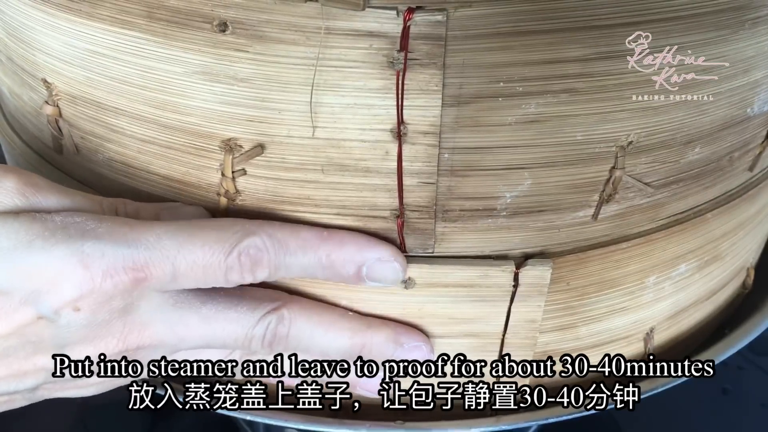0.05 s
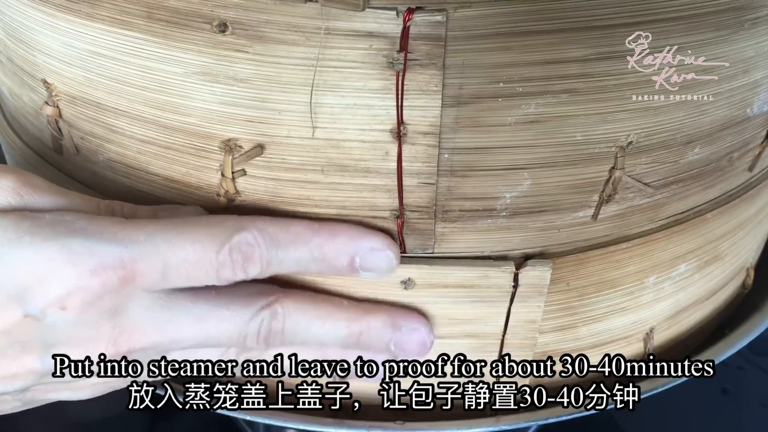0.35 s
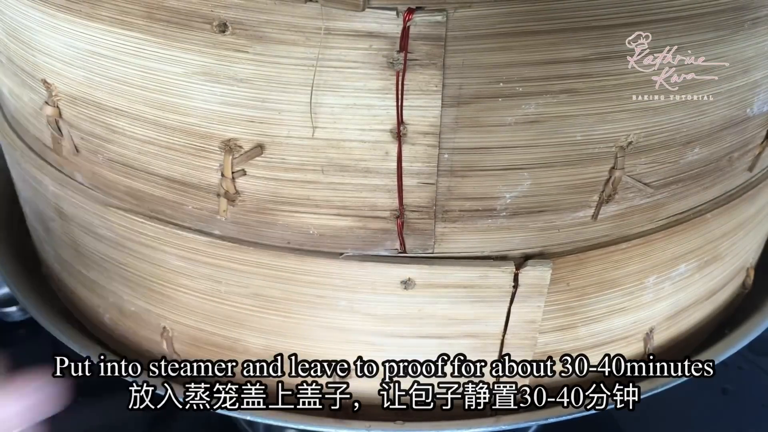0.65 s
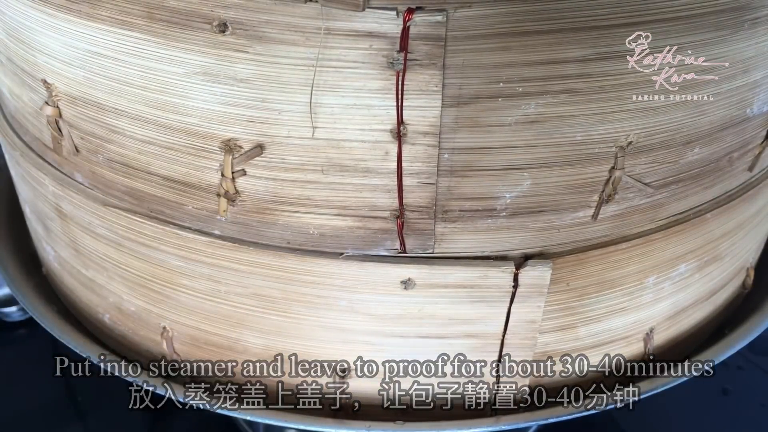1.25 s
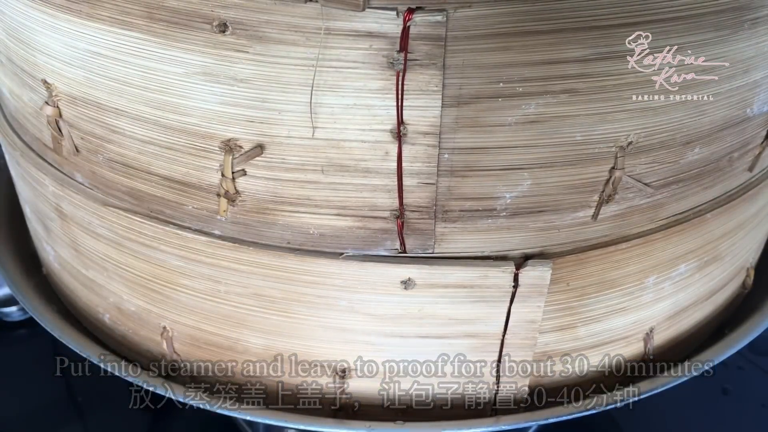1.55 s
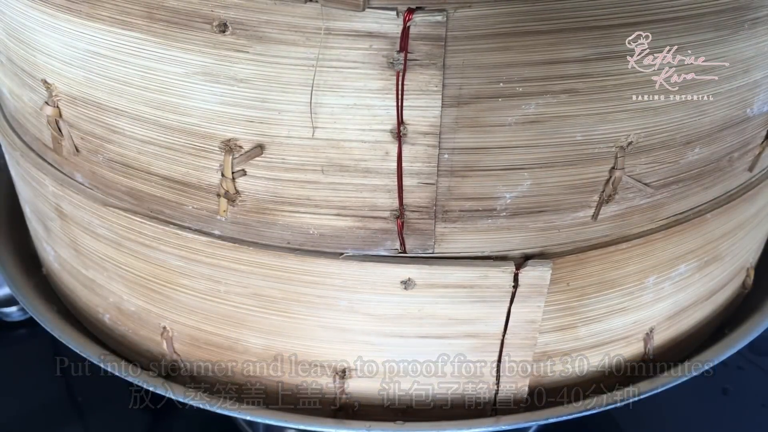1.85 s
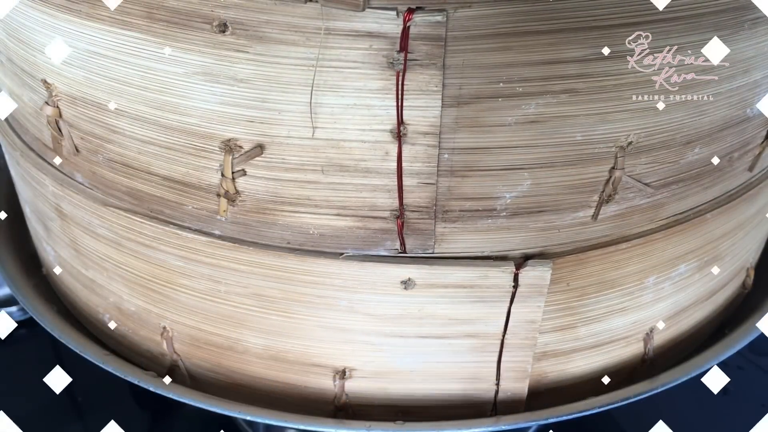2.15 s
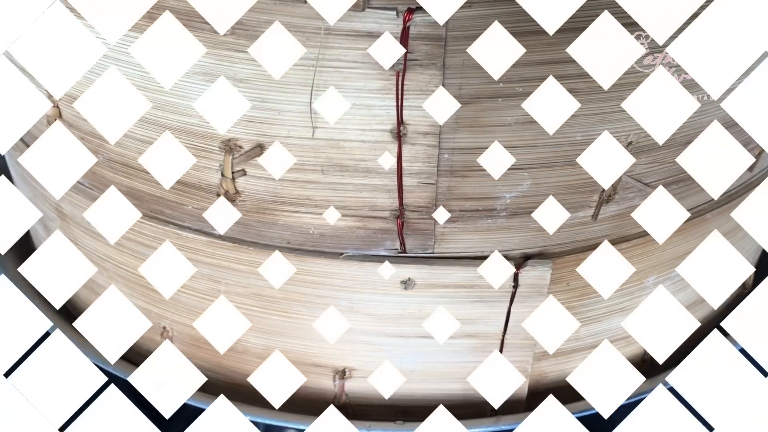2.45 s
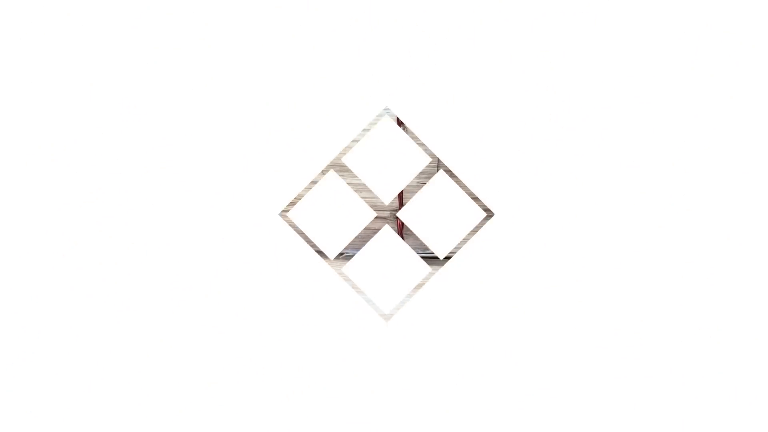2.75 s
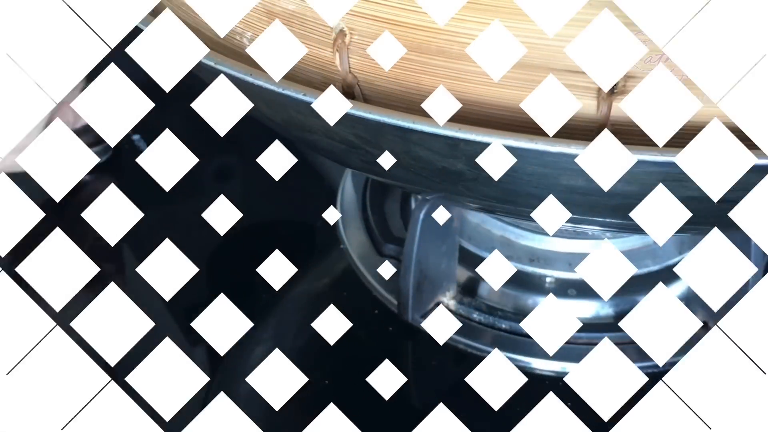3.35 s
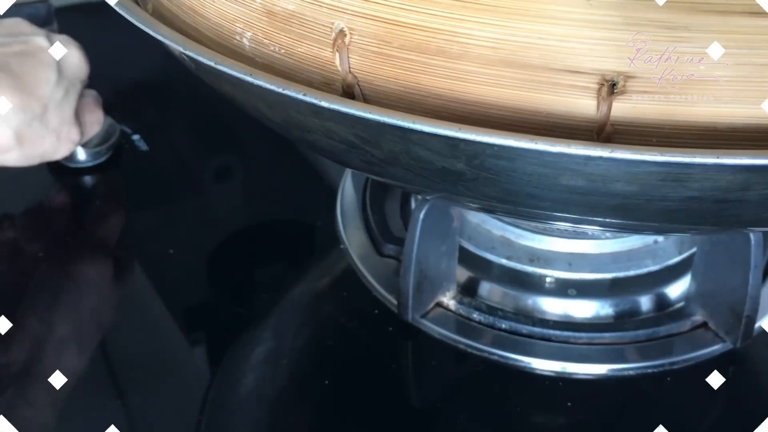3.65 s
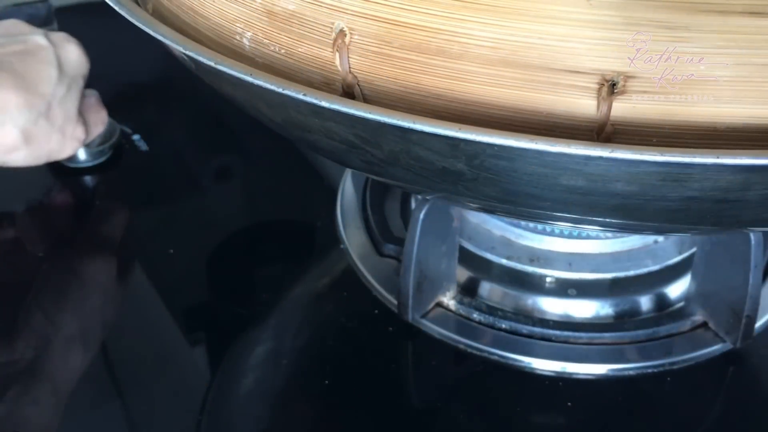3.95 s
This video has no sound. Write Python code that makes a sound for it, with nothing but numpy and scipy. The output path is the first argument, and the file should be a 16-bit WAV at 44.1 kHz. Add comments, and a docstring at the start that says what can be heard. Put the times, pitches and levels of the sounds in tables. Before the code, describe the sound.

A gas stove igniter fires a quick run of sharp snaps under a pan, and the flame catches with a low flutter. Before that come faint kitchen hum, a barely audible brush on a bamboo steamer and a knob click.

```python
"""Lighting a gas stove

A quiet kitchen hums. A hand brushes over a bamboo steamer and lets go. A gas knob is pushed in and
turned; the igniter snaps about nine times a second under the pan, ringing the metal and the room.
The fifth spark lights the gas with a fluttering whoomph; the two sparks in the flame are much weaker."""
import sys
import numpy as np
from scipy import signal
from scipy.fft import rfft, irfft
from scipy.io import wavfile
from scipy.ndimage import uniform_filter1d

SR = 44100
rng = np.random.default_rng(int(sys.argv[2]) if len(sys.argv) > 2 else 0)


def transcribe(u):
    """Save the signal u as a 16-bit wav file named by the first command-line argument.

    u: samples, shape (n,) or (channels, n), limited to [-1, 1]; the rate is SR.
    q: integer samples, one column per channel.
    """
    v = np.clip(np.atleast_2d(u).T, -1, 1)
    q = np.round(v * 32767).astype(np.int16)
    wavfile.write(sys.argv[1], SR, q)


N = 176400
T = np.arange(N) / SR


def from_db(db):
    """Decibels to gain."""
    return 10 ** (np.asarray(db) / 20)


def rms_one(x):
    """Scale to rms 1."""
    return x / np.sqrt(np.mean(x ** 2) + 1e-30)


def energy_one(x):
    """Scale to energy 1."""
    return rms_one(x) / np.sqrt(len(x))


def white():
    """White noise."""
    return rng.standard_normal(N)


def colour(x, points):
    """Minimum-phase filter through (Hz, dB) points, rolled off below 20 Hz."""
    hz, db = np.transpose(points)
    bins_hz = np.maximum(np.arange(N + 1) * SR / (2 * N), 1)
    gain = from_db(np.interp(np.log(bins_hz), np.log(hz), db)) * bins_hz / np.hypot(bins_hz, 20)
    cepstrum = irfft(np.log(gain))
    cepstrum[1:N] *= 2
    cepstrum[N + 1:] = 0
    return irfft(rfft(x, 2 * N) * np.exp(rfft(cepstrum)))[:N]


def rolloff(x, hz, kind):
    """Second-order low- or high-pass."""
    return signal.sosfilt(signal.butter(2, hz, kind, fs=SR, output="sos"), x)


def resonate(x, hz, width_hz):
    """One resonance, applied twice for steep skirts."""
    r = np.exp(-np.pi * width_hz / SR)
    b, a = [1 - r, 0, r - 1], [1, -2 * r * np.cos(2 * np.pi * hz / SR), r * r]
    return signal.lfilter(b, a, signal.lfilter(b, a, x + 1e-18))


def decay(t60_s):
    """Exponential decay."""
    return np.exp(-np.minimum(np.log(1000) * T / t60_s, 60))


def ring(hz, t60_s):
    """Damped sine."""
    return np.sin(2 * np.pi * hz * T) * decay(t60_s)


def add(out, start_s, x):
    """Mix x in from start_s."""
    i = int(np.clip(start_s * SR, 0, N - 1))
    out[i:] += x[:N - i]


def swell(start_s, length_s, rise_share):
    """Rounded rise and fall."""
    corners_s = start_s + length_s * np.array([0, rise_share, 1])
    return np.sin(np.pi / 2 * np.interp(T, corners_s, [0, 1, 0]))


def tones(rows, steady_s=0.046):
    """Narrow noise lines of wavering pitch and nearly even strength."""
    out = np.zeros(N)
    for hz, db, half_width_hz in rows:
        line = rms_one(resonate(rng.standard_normal(N + SR), hz, 2 * half_width_hz)[SR:])
        power = uniform_filter1d(line ** 2, int(steady_s * SR))
        out += from_db(db) * line / np.sqrt(power + 1e-6)
    return out


def scatter(paths, envelope, size=4096, even_over_hz=935):
    """Burst of dense reflections, flattened so only its fine colour is random; energy 1."""
    x = paths[:size]
    for _ in range(4):
        power = uniform_filter1d(np.abs(rfft(x * envelope[:size])) ** 2, int(even_over_hz * size / SR))
        x = rms_one(irfft(rfft(x) / np.sqrt(power + 1e-20)))
    return energy_one(np.pad(x, (0, N - size)) * envelope)


def walls(split_hz=4060):
    """Diffuse room tail; the treble dies sooner."""
    low = rolloff(white(), split_hz, "low") * decay(t60_s=0.69)
    return low + rolloff(white(), split_hz, "high") * decay(t60_s=0.45)


def igniter():
    """Each spark rattles between burner and pan by nearly the same paths, ringing metal and room."""
    # Each row: start in seconds, level in dB, room send in dB.
    sparks = [(3.2710, -3.5, -2.5), (3.3860, -1, -4.5), (3.501, -0.5, -2), (3.6158, -2.5, -0.5),
              (3.7310, -1.5, -1.5), (3.8463, -13, -2), (3.9624, -13, -2.5)]
    # Colour of the gap under the pan. Each row: frequency in Hz, gain in dB.
    gap_colour = [(30, -24), (100, -14), (220, 2.5), (500, -3.5), (850, -9), (1300, -8.5), (1700, -3.5),
                  (4500, -5), (5700, 1), (7800, -5.5), (9400, -8), (10500, -5), (11400, -2), (15500, -4)]
    # Burner and pan. Each row: frequency in Hz, level in dB, T60 in seconds.
    metal_modes = [(208, -31.5, 0.026), (793, -38.5, 0.013), (1524, -47.5, 0.12), (2190, -46.5, 0.14),
                   (2900, -47, 0.13), (5844, -28.5, 0.014), (5710, -38, 0.029), (6180, -36, 0.025),
                   (8980, -35, 0.039), (9450, -21.5, 0.01), (11630, -28.5, 0.016)]
    # Kitchen response. Each row: frequency in Hz, gain in dB.
    room_colour = [(150, 0.5), (350, -7.5), (550, -12), (1200, -5.5), (1600, -0.5), (2300, -3.5),
                   (3000, -1.5), (4500, -1.5), (6400, 4.5), (7800, 0), (9400, 4.5), (10500, -2), (12500, 1),
                   (15500, 3)]
    path_change, room_change = 0.54, 0.41  # fresh noise per spark
    bounce_s = 0.0011  # the crack returns off the pan
    paths = white()
    burst = lambda rise_s, t60_s: energy_one((1 - np.exp(-T / rise_s)) * decay(t60_s))
    crack = burst(rise_s=0.00027, t60_s=0.0059)  # first, hardest reflections
    rattle = from_db(-0.5) * burst(rise_s=0.00031, t60_s=0.01)
    bounce = from_db(-12) * np.interp(T - bounce_s, T, crack)
    envelope = np.sqrt(crack ** 2 + rattle ** 2 + bounce ** 2)
    metal = sum(from_db(db) * ring(hz, t60_s) for hz, db, t60_s in metal_modes)
    tail = walls()
    early = from_db(-2.5) * energy_one(white() * decay(t60_s=0.061))
    snaps, rings, room = np.zeros((3, N))
    for start_s, db, send_db in sparks:
        snap = np.linalg.norm(envelope) * scatter(paths + path_change * white(), envelope)
        late = from_db(-3.5) * energy_one(tail + room_change * walls())
        add(snaps, start_s, from_db(db) * snap)
        add(rings, start_s, from_db(db) * metal)
        add(room, start_s, from_db(db + send_db) * (early + late))
    return colour(snaps, gap_colour) + rings + colour(room, room_colour)


def flame():
    """Fire runs round the burner: turbulent rumble rings the hollow under the pan."""
    # Flame size. Each row: time in seconds, level in dB.
    growth = [(3.725, -80), (3.741, -43), (3.76, -46.5), (3.773, -34.5), (3.81, -43), (3.85, -37.5),
              (3.885, -30), (3.92, -38), (3.97, -39.5), (4.0, -44.5)]
    # Turbulence. Each row: frequency in Hz, gain in dB.
    roar_colour = [(25, -10), (60, 4.5), (95, -6.5), (170, 2.5), (250, -8.5), (320, -7.5), (420, -12.5),
                   (710, -15), (820, -27), (1500, -28), (4000, -40), (12000, -49)]
    # Each row: frequency in Hz, level in dB, half-width in Hz.
    hollow_modes = [(62.3, -6.5, 16), (91, -4.5, 17), (161, -8.5, 18), (318.5, -9.5, 15.6),
                    (496, -18.5, 44), (645, -18.5, 85)]
    # Parts of the burner catch. Each row: start in seconds, level in dB, pitch in Hz, T60 in seconds.
    pops = [(3.764, -28.5, 155, 0.12), (3.875, -27, 98, 0.03)]
    # The spreading flame spits. Each row: start in seconds, level in dB.
    spits = [(3.8635, -23), (3.8902, -18), (3.972, -26.5)]
    times_s, size_db = np.transpose(growth)
    envelope = from_db(np.interp(T, times_s, size_db)) * (T > times_s[0])
    roar = from_db(-4) * rms_one(colour(white(), roar_colour))
    out = envelope * (roar + tones(hollow_modes))
    for start_s, db, hz, t60_s in pops:
        add(out, start_s, from_db(db) * ring(hz, t60_s))
    for start_s, db in spits:
        spit = resonate(white() * decay(t60_s=0.01), hz=556, width_hz=680)
        add(out, start_s, from_db(db) * energy_one(spit))
    return out


def knob():
    """A bright catch, then duller knocks as the valve opens, each with a room tail."""
    # Each row: start in seconds, level in dB, ring in Hz, Q, T60 in seconds, relative tick in dB.
    knocks = [(3.1572, -20.5, 2374, 2.9, 0.04, -4.5), (3.160, -24.5, 475, 1.5, 0.077, -30),
              (3.1949, -29.5, 3130, 7, 0.027, -12), (3.1968, -23.5, 1600, 4.6, 0.025, -30),
              (3.211, -14, 383, 0.96, 0.02, -38), (3.213, -20.5, 861, 7.2, 0.053, -41)]
    # Each row: frequency in Hz, gain in dB.
    tick_colour = [(1000, -16), (3000, -9), (6000, 6), (9500, 5), (10600, -6), (11700, 6), (13000, -7),
                   (16000, -17)]
    body_tail = from_db(1) * energy_one(decay(t60_s=0.38))
    tick_tail = from_db(-4.5) * energy_one(decay(t60_s=0.67))
    tick_envelope = np.hypot(energy_one(decay(t60_s=0.026)), tick_tail)
    out = np.zeros(N)
    for start_s, db, hz, q, t60_s, tick_db in knocks:
        envelope = np.hypot(energy_one(decay(t60_s)) / 2, body_tail)
        rattle = rms_one(resonate(white(), hz, hz / q)) * envelope
        body = energy_one(rattle + from_db(-1.5) * energy_one(ring(hz, t60_s)))
        tick = energy_one(colour(white(), tick_colour) * tick_envelope)
        add(out, start_s, from_db(db) * (body + from_db(tick_db) * tick))
    return out


def steamer_brushes():
    """Grainy friction of a hand on bamboo slats; the fibres crinkle lightly."""
    # Each row: start and length in seconds, level in dB, rise share, ring in Hz, relative ring in dB.
    strokes = [(0.149, 0.048, -68, 0.37, 1480, 0.5), (0.196, 0.082, -68.5, 0.11, 2090, 0),
               (0.212, 0.2, -61, 0.5, 2060, -5.5), (.36, 0.53, -80.5, 0.61, 6040, -10),
               (0.734, 0.13, -73.5, .06, 3020, 2), (0.82, 0.17, -72, 0.39, 3300, -6),
               (.96, 0.18, -79, 0.45, 3300, -20)]
    # Each row: start and length in seconds, level in dB.
    crinkles = [(0.79, 0.51, -78.5), (1.123, 0.42, -74.5), (1.214, 0.026, -60.5), (1.301, 0.021, -68.5)]
    # Each row of both: frequency in Hz, gain in dB.
    rub_colour = [(300, -8), (800, 0), (1800, 4), (2600, 0), (5800, -1.5), (7500, -6.5), (9300, -8),
                  (15000, -12.5)]
    crinkle_colour = [(1500, -14), (4000, -11.5), (6500, -4), (11500, -4), (15500, -8.5)]
    # Each row: frequency in Hz, level in dB, half-width in Hz.
    slat_modes = [(6060, -14, 340), (9000, -16, 240)]
    grain_hz, grain_db, ring_q = 150, 1.5, 7
    grain = rms_one(rolloff(white(), grain_hz, "low"))
    friction = white() * from_db(grain_db * grain)
    rub = rms_one(colour(friction, rub_colour)) + tones(slat_modes)
    crinkle = rms_one(colour(friction, crinkle_colour))
    out = np.zeros(N)
    for start_s, length_s, db, rise_share, hz, ring_db in strokes:
        ringing = from_db(ring_db) * rms_one(resonate(white(), hz, hz / ring_q))
        out += from_db(db) * swell(start_s, length_s, rise_share) * (rub + ringing)
    for start_s, length_s, db in crinkles:
        out += from_db(db) * swell(start_s, length_s, rise_share=0.34) ** 2 * crinkle
    return out


def steamer_bumps():
    """Soft, low bumps as the steamer's body shifts under the hand."""
    # Each row: start and length in seconds, level in dB, pitch in Hz.
    shifts = [(.01, 0.2, -70.5, 176), (0.198, 0.09, -63.5, 165)]
    return sum(swell(start_s, length_s, rise_share=0.24) * tones([(hz, db, hz / 4)])
               for start_s, length_s, db, hz in shifts)


def kitchen():
    """Room air with appliance and mains hum; louder, with a thin whine, by the stove."""
    # Each row of both: frequency in Hz, gain in dB.
    air_colour = [(25, -15.5), (40, -6), (55, -1.5), (80, -2), (125, -9.5), (330, -12.5), (520, -18.5),
                  (830, -20.5), (1300, -25), (4000, -33), (9000, -36.5), (15500, -41.5)]
    stove_air_colour = [(30, -12), (120, 3), (270, 0), (500, -8), (1000, -13), (5000, -26), (15000, -40)]
    # Each row: frequency in Hz, rms level in dB.
    hum_lines = [(68.5, -65), (100, -70.5), (108, -79), (273, -82.5), (294.7, -83), (344, -84), (393, -79)]
    # Each row: frequency in Hz, level in dB, half-width in Hz.
    whine_lines = [(353, -68, 13), (2410, -78, 17), (2430, -89, 220), (4500, -92, 50)]
    stove_from_s, fade_s = 2.92, 0.0028
    by_stove = np.clip((T - stove_from_s) / fade_s, 0, 1)
    stove = tones(whine_lines) + from_db(-62.5) * rms_one(colour(white(), stove_air_colour))
    hum = sum(from_db(db) * np.sqrt(2) * np.sin(2 * np.pi * (hz * T + rng.random()))
              for hz, db in hum_lines)
    air = from_db(-66) * rms_one(colour(white(), air_colour))
    return air + hum + by_stove * stove


def scene():
    """All sources, mono."""
    return (kitchen() + steamer_brushes() + steamer_bumps() + knob() + igniter() + flame())[None]


def record(dry):
    """Deepest bass rolled off, top cut steeply."""
    low_cut_hz, high_cut_hz = 27, 15800
    high_cut = signal.ellip(10, 0.2, 70, high_cut_hz, fs=SR, output="sos")
    return signal.sosfilt(high_cut, rolloff(dry, low_cut_hz, "high"))


dry = scene()
out = record(dry)
transcribe(out)
```